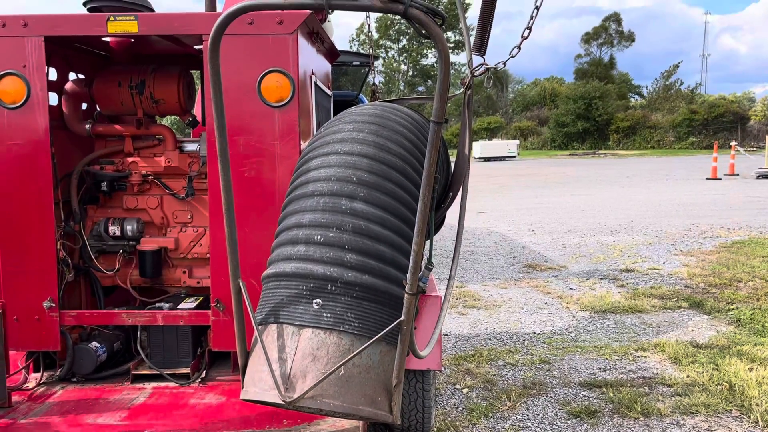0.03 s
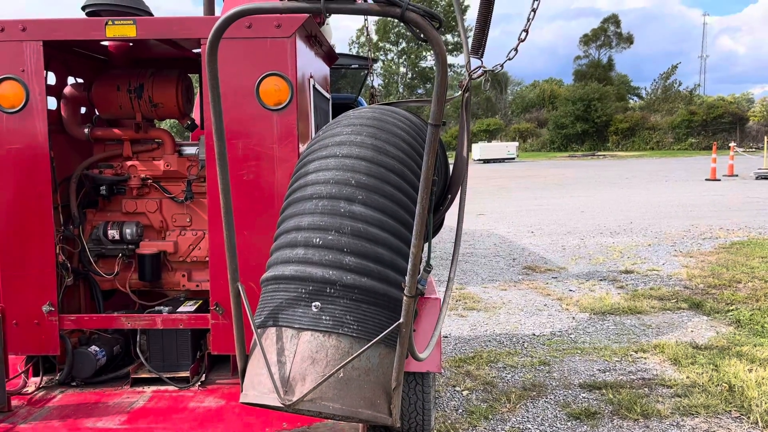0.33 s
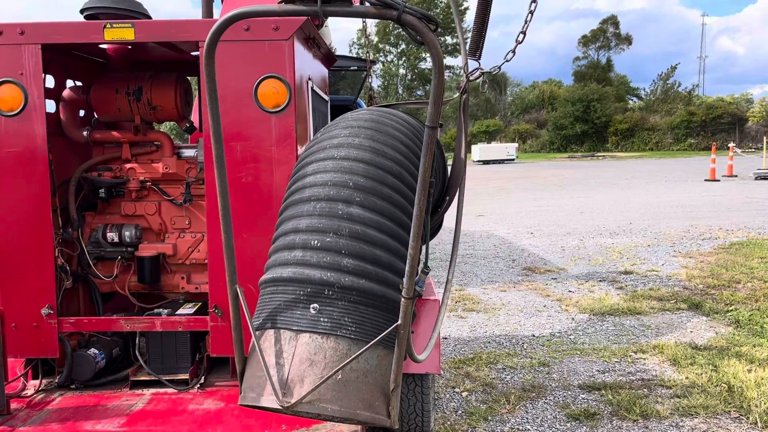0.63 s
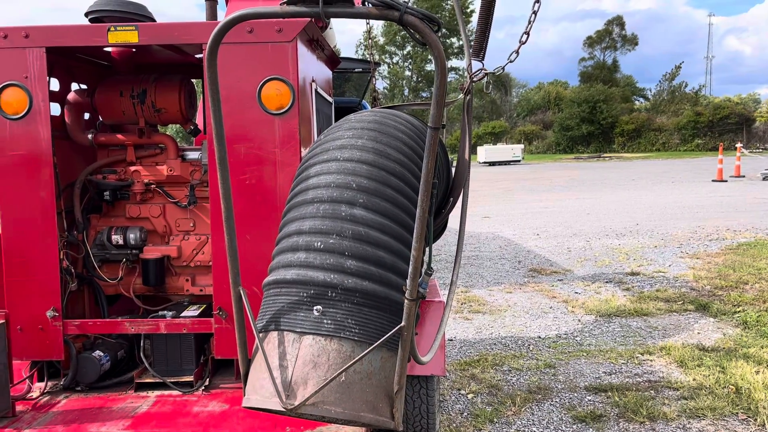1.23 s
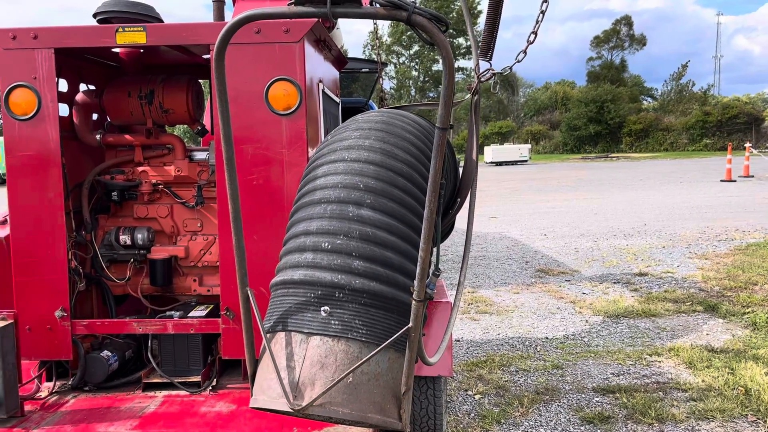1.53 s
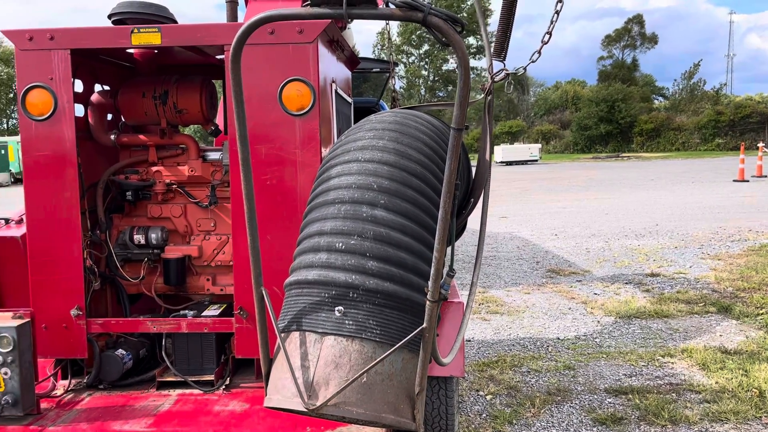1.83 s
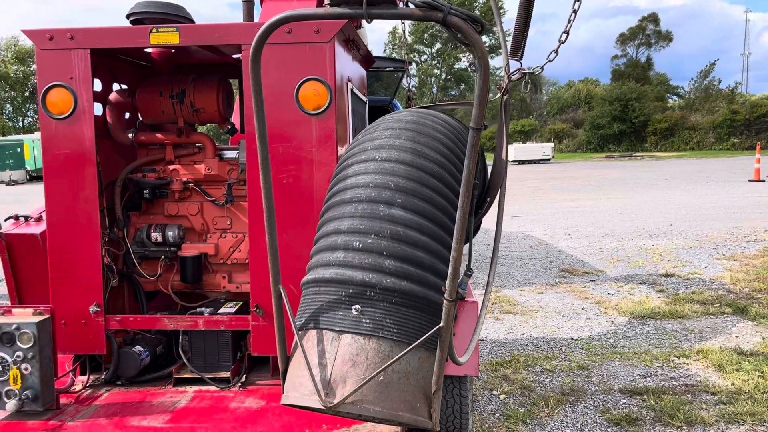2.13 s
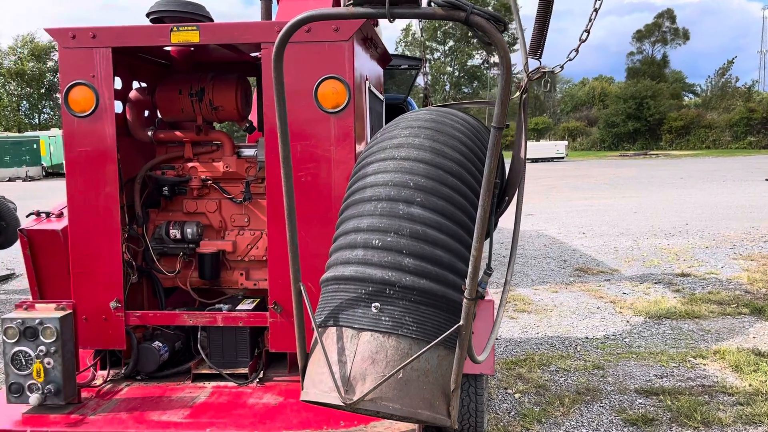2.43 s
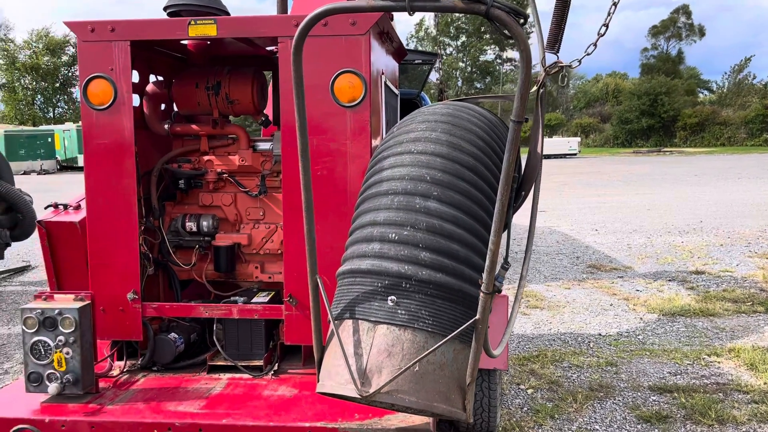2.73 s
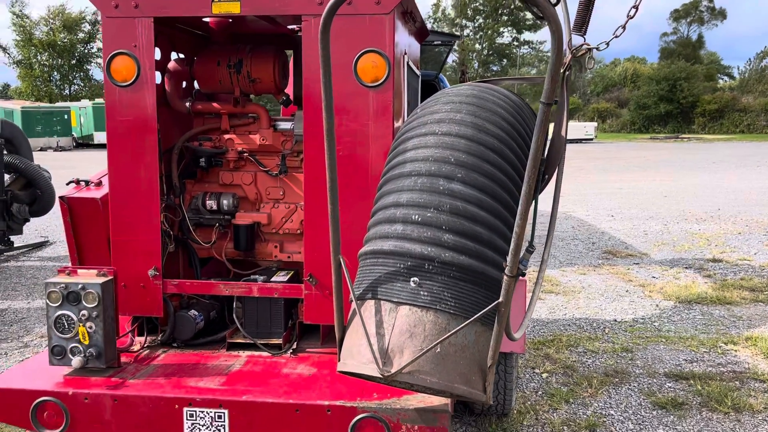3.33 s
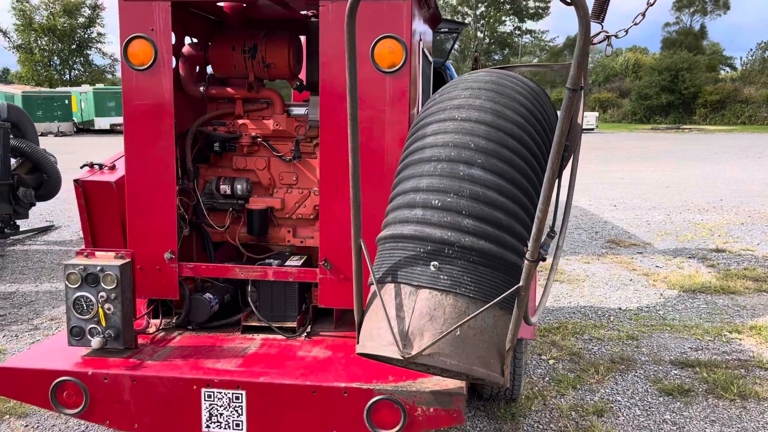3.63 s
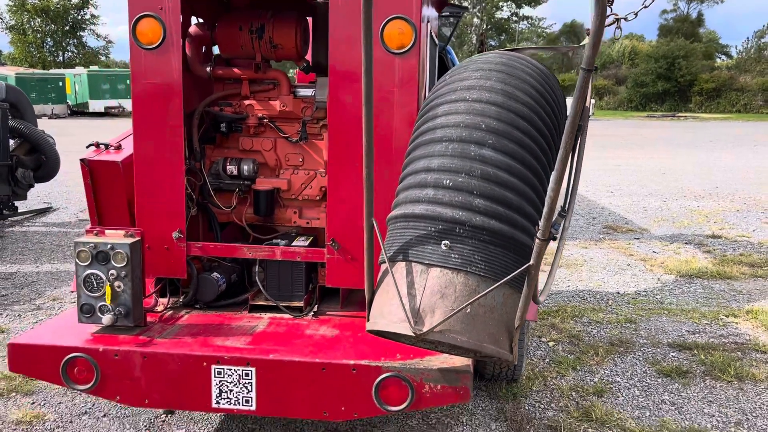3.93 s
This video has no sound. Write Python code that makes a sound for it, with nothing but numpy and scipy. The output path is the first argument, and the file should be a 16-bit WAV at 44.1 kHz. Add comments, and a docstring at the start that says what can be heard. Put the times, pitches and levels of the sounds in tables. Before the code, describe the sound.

A diesel engine on a leaf vacuum runs loudly outdoors, close and slightly left. For the first 0.8 seconds its exhaust barks roughly as the speed rises a touch. It then holds steady until 4 seconds, humming, clattering and hissing, with occasional sharp ticks and rushing fan air. Wind thumps the microphone around 1 second and repeatedly from 2.5 seconds, hardest at about 3.6.

```python
"""The four-cylinder diesel of a leaf vacuum, outdoors, close to a stereo microphone and a little left.
Its side panel is open. The exhaust barks a little as it pulls up the last bit of speed, then it holds
steady: crank orders hum, valves and injectors clatter and tick, combustion hisses and the impeller
rushes. A light breeze crosses the microphone, and gusts buffet it, hardest towards the end."""
import sys
import numpy as np
from scipy import signal
from scipy.fft import rfft, irfft, next_fast_len
from scipy.io import wavfile
from scipy.ndimage import uniform_filter1d, map_coordinates

SR = 44100
rng = np.random.default_rng(int(sys.argv[2]) if len(sys.argv) > 2 else 0)


def file_out(sig):
    """Save sig as 16-bit WAV at sys.argv[1]."""
    # one column per channel
    cols = np.atleast_2d(sig).T
    # limit, then scale
    lim = np.clip(cols, -1, 1)
    pcm = np.round(lim * 32767).astype(np.int16)
    wavfile.write(sys.argv[1], SR, pcm)


N = 176400
CYLINDERS = 4
STRIKE_JITTER_S = 0.00006  # timing scatter of valves and injectors


def amp(db):
    """Decibels to gain."""
    return np.exp(np.asarray(db) * (np.log(10) / 20))


def unit(x):
    """Scale to rms 1."""
    return x / np.sqrt(np.mean(x ** 2) + 1e-20)


def along(points, hz):
    """(f/Hz, value) points read on a log axis."""
    freqs, values = np.transpose(points)
    return np.interp(np.log(hz + 1), np.log(freqs + 1), values)


def curve(points):
    """(t/s, value) points read at every sample."""
    return np.interp(np.arange(N) / SR, *np.transpose(points))


def bump(at_s, half_s):
    """A bell-shaped swell of height 1."""
    return np.exp(-((np.arange(N) / SR - at_s) / half_s) ** 2)


def wobble(rate):
    """A smooth random curve, rate knots a second."""
    at = np.linspace(0, N, 4000)
    knots = rng.standard_normal(2000)
    return np.interp(np.arange(N), at, map_coordinates(knots, [at * rate / SR], order=3, mode="mirror"))


def tone(cycles, drift_rad=0):
    """A sine of rms 1 that follows a cycle count from a random phase."""
    return np.sqrt(2) * np.sin(2 * np.pi * (cycles + rng.random()) + drift_rad)


def noise():
    """Two unrelated white noises."""
    return rng.standard_normal((2, N))


def filtered(x, response):
    """Filter x by a gain that depends on frequency."""
    size = next_fast_len(N + SR // 2)
    return irfft(rfft(x, size) * response(np.fft.rfftfreq(size, 1 / SR)), size)[..., :N]


def strikes(count, jitter_s, scatter_db):
    """One pulse each time a rising count passes a whole number, uneven in time and size."""
    whole = np.arange(np.ceil(count[0]), count[-1])
    chance = rng.standard_normal((512, 2))[:len(whole)]
    at = np.interp(whole, count, np.arange(N)) + jitter_s * SR * chance[:, 0]
    taps = np.floor(at)[:, None] + np.arange(-7, 9)
    offset = taps - at[:, None]
    shape = np.sinc(offset) * np.sinc(offset / 8)  # lets a pulse fall between samples
    pulses = shape * amp(scatter_db * chance[:, 1:])
    return np.bincount(np.clip(taps, 0, N - 1).astype(int).ravel(), pulses.ravel(), N)


def ring(pulses, t60_s):
    """Pulses ring a dense set of short modes, heard along two paths."""
    t = np.arange(SR // 10) / SR
    response = unit(rng.standard_normal((2, len(t))) * amp(-60 * t / t60_s))
    return signal.fftconvolve(pulses[None], response, axes=1)[:, :N]


# Likeness of the microphone's left and right: f/Hz, correlation
MIC_CORRELATION = [(100, 0.86), (700, 0.99), (1300, 0.6), (2000, 0.98), (3600, 0.54), (7000, 0.51),
                   (8200, 1)]
def spread(pair, spectrum):
    """Colour two unrelated signals and blend them to left and right, rms 1."""
    def mid_side_gains(hz):
        angle = np.arccos(np.clip(along(MIC_CORRELATION, hz), -1, 1)) / 2
        return amp(along(spectrum, hz)) * np.array([np.cos(angle), np.sin(angle)])
    mid, side = filtered(pair, mid_side_gains)
    return unit(np.array([mid + side, mid - side]))


def turbulence(spectrum):
    """Churning air of even strength, so that the gust alone shapes its level."""
    air = spread(noise(), spectrum)
    power = uniform_filter1d(np.mean(air ** 2, axis=0), size=1100)
    return air / np.sqrt(np.abs(power))


# Gusts on the microphone: t/s, half length/s, level/dB
WIND_GUSTS = [(.85, 0.053, -25), (1.134, 0.034, -26.5), (2.58, 0.15, -29), (2.83, .04, -28),
              (3.048, 0.068, -23.5), (3.237, 0.062, -22.5), (3.591, 0.06, -18), (3.935, 0.026, -20.5)]
# Their low thump: f/Hz, relative level/dB
BUFFET_SPECTRUM = [(22, -32), (38, -2), (54, 2), (78, 4), (115, -7.5), (300, -20.5), (900, -72)]
# Eddies of the hardest gusts: f/Hz, relative level/dB
EDDY_SPECTRUM = [(60, -14), (100, -3), (200, 0), (320, -0.5), (480, -11), (1500, -65)]
def wind(breeze_db=-37.5, eddies_db=-20):
    """Gusts thump right on the microphone over a light breeze; the hardest reach higher in frequency."""
    gust = amp(breeze_db) + sum(amp(db) * bump(at_s, half_s) for at_s, half_s, db in WIND_GUSTS)
    eddies = amp(eddies_db) * (gust / gust.max()) ** 2.64
    return gust * turbulence(BUFFET_SPECTRUM) + eddies * turbulence(EDDY_SPECTRUM)


# Resonances of the steel enclosure: f/Hz, half width/Hz, level/dB
PANEL_MODES = [(1440, 140, 3), (5180, 74, 3), (5880, 51, 4.5), (6340, 99, 4)]
# Left over right at the microphone: f/Hz, level/dB
LEFT_LEVEL = [(60, 1), (600, 2.5), (1300, 4.5), (1600, 0), (2800, 0), (3600, 5), (5500, 0)]
# Lead of the left microphone port: f/Hz, phase/rad
LEFT_PHASE = [(100, 0), (1200, 0.72), (1520, 2.5), (1750, -0.13), (2200, 0.28), (3200, 1.75), (4500, 0.5),
              (5400, -1.7), (6500, 0), (7800, -3), (14000, -7.5)]
def enclosure_to_mic(hz):
    """The enclosure's colour, and the level and phase with which it reaches each microphone port."""
    share = np.array([[0.5], [-0.5]])  # left, right
    panels_db = sum(db / (1 + ((hz - centre) / width) ** 2) for centre, width, db in PANEL_MODES)
    return amp(panels_db + share * along(LEFT_LEVEL, hz)) * np.exp(1j * share * along(LEFT_PHASE, hz))


# Airflow behind the engine's sound: f/Hz, relative level/dB
RUSH_SPECTRUM = [(25, -22), (50, -11.5), (90, 2.5), (170, -6.5), (300, -4.5), (700, -3.5), (1000, -5.5),
                 (1500, -8.5), (2500, -10), (14000, -39.5)]
def impeller(level_db=-26):
    """Air rushes steadily through the fan and the hose."""
    return amp(level_db) * spread(noise(), RUSH_SPECTRUM)


# Colour of the hiss: f/Hz, relative level/dB
HISS_SPECTRUM = [(1500, -10), (3000, -2), (4300, 0.5), (6200, 0.5), (7000, -4), (10000, -10), (14000, -16)]
# Its slow easing: t/s, relative level/dB
HISS_TREND = [(0, -24), (.8, -25), (2.2, -27), (3.1, -28.5)]
def combustion_hiss(firings, level_db=-32.5, pulse_db=0.75, flicker_db=1.26):
    """Bright combustion noise that flares with every firing, each flare of its own strength."""
    trend_db = curve(HISS_TREND)
    strength = rng.uniform(0.6, 1.4, 512)[firings.astype(int)]
    flare = np.exp(-(firings % 1) / 0.55) * strength
    flare_db = pulse_db * unit(flare - flare.mean()) + flicker_db * wobble(120)
    return amp(level_db + trend_db - trend_db.mean()) * spread(noise() * amp(flare_db), HISS_SPECTRUM)


# The sharpest metallic ticks: t/s, relative level/dB
SHARP_TICKS = [(.157, 11.5), (.804, 8), (1.377, 9), (1.664, 8), (3.665, 3), (3.949, 5)]
# Colour of all ticks: f/Hz, relative level/dB
TICK_SPECTRUM = [(2500, -22), (6000, 0), (10500, 0.5), (14000, -6)]
def injection_ticks(firings, level_db=-47.5, soft_db=-6):
    """The injection ticks lightly with every firing; now and then one tick is much sharper."""
    cylinder_db = 4 * np.cos(2 * np.pi * firings / CYLINDERS)  # one cylinder ticks hardest
    pulses = amp(soft_db + cylinder_db) * strikes(firings, STRIKE_JITTER_S, scatter_db=4)
    for at_s, db in SHARP_TICKS:
        pulses[round(at_s * SR)] += amp(db)
    return amp(level_db) * spread(ring(pulses, t60_s=0.037), TICK_SPECTRUM)


# The ringing engine block, from close by: f/Hz, relative level/dB
BLOCK_SPECTRUM = [(400, -29), (620, -1.5), (900, 1), (1350, -1), (1900, -8.5), (2500, -7.5), (3500, -11.5),
                  (6300, -20), (9000, -24.5), (14000, -22.5)]
def clatter(firings, parts=14, level_db=-29):
    """Valves and injectors each strike once a cycle at their own crank angle, with their own ring."""
    ringing = np.zeros((2, N))
    for part in range(parts):
        cycles = firings / CYLINDERS + (part + rng.random()) / parts
        ringing += ring(strikes(cycles, STRIKE_JITTER_S, scatter_db=0.8), t60_s=0.038)
    return amp(level_db) * spread(ringing, BLOCK_SPECTRUM)


# Exhaust tones as the speed climbs: t/s, half length/s, firing harmonic, level/dB
EXHAUST_SWELLS = [(.04, 0.16, 2, -24), (0.28, 0.075, 4, -25), (.38, 0.18, 2, -28), (0.442, 0.069, 6, -26.5),
                  (0.376, 0.058, 12, -30), (0.505, 0.12, 8, -32), (0.584, 0.035, 13, -28)]
def exhaust_swells(firings):
    """Harmonics of the firing rate swell and fade one after another."""
    return sum(amp(db) * bump(at_s, half_s) * tone(harmonic * firings)
               for at_s, half_s, harmonic, db in EXHAUST_SWELLS)


# Course of the exhaust drone: t/s, level/dB
DRONE_LEVEL = [(.55, -34), (.69, -46), (.82, -33), (1.6, -33.5), (2.3, -33), (2.7, -29.5), (3.2, -34),
               (3.85, -32)]
def exhaust_drone(firings, harmonic=6):
    """One exhaust harmonic stands out, and swells for a while after the speed has settled."""
    return amp(curve(DRONE_LEVEL)) * tone(harmonic * firings)


# Exhaust puffs, from close by: f/Hz, relative level/dB
BARK_SPECTRUM = [(70, -25), (110, 3), (165, -10), (320, 1), (520, 1), (760, 4.5), (1000, -9), (3000, -36)]
def exhaust_bark(firings, load, full_load_db=-25, roughness=0.96):
    """Under load each firing leaves the exhaust as a sharp, rough puff."""
    pulses = strikes(firings, jitter_s=0.000089, scatter_db=2.0)
    gas = unit(noise() * amp(2.6 * np.cos(2 * np.pi * firings)))
    puffs = unit(ring(pulses, t60_s=0.013))
    return amp(full_load_db) * load * spread(puffs + roughness * gas, BARK_SPECTRUM)


# Moments when wind on the microphone briefly cancels the low throb: t/s
WIND_CANCELS = [0.895, 1.18, 2.71, 3.32, 3.511]
def firing_throb(firings, load, base_db=-27, load_db=2.5, waver_db=0.8, cancel_db=-17):
    """The low, wavering firing tone, stronger under load; set level cuts stand for wind cancelling it."""
    cancels = sum(bump(at_s, half_s=0.022) for at_s in WIND_CANCELS)
    return amp(base_db + load_db * load + waver_db * wobble(20) + cancel_db * cancels) * tone(firings)


# The engine's hum: multiple of the crank rate, relative level/dB
HUM_ORDERS = [(2.5, -10), (3, -16), (3.5, -12.5), (4, -7), (4.5, -11.5), (5.5, -12), (6, -3.5), (7, -4.5),
              (7.5, -12), (8, -9), (8.5, -16), (9, -13.5), (9.5, -12), (10, -15.5), (11, -8), (12.5, -19.5),
              (13, -11), (14, -19.5), (14.5, -14.5), (15, -8.5), (16.5, -13.5), (17, -6.5), (18, -17.5),
              (18.5, -21), (19, -16), (19.5, -14.5), (20, -9.5)]
# Whine of the fan and gear train: multiple of the crank rate, relative level/dB
WHINE_ORDERS = [(20.5, -12.5), (23, -14), (24, -14), (25, -15.5), (26, -12.5), (27.5, -13.5), (31.5, -13.5),
                (38.5, -16), (40, -19), (43.5, -16), (48.5, -13)]
def crank_hum(turns, load, base_db=-28, load_db=-3.5, waver_db=1.2):
    """Orders of the crankshaft, softer under load; half orders come from unequal cylinders."""
    hum = np.zeros(N)
    for order, db in list(HUM_ORDERS) + list(WHINE_ORDERS):
        partial = tone(order * turns, drift_rad=0.3 * wobble(10))
        hum += amp(db + load_db * load + waver_db * wobble(3.9)) * partial
    return amp(base_db) * hum


# Rotation of the crankshaft: t/s, f/Hz
CRANK_RATE = [(0, 26.6), (.15, 26.8), (.28, 27), (.45, 27.5), (.6, 27.6), (.8, 27.94), (4, 28.03)]
# Load, high while the engine gathers speed: t/s, load (0-1)
ENGINE_LOAD = [(0, 0.93), (.25, 0.92), (.6, 0.72), (.7, 0.5), (1.2, 0.2)]
def scene():
    """One crankshaft drives all engine layers; the machine stands close by, a little to the left."""
    crank_hz = curve(CRANK_RATE) * (1 + 0.000595 * wobble(7))
    turns = np.cumsum(crank_hz) / SR
    firings = turns * CYLINDERS / 2  # each cylinder fires every second turn
    load = curve(ENGINE_LOAD)
    machine = firing_throb(firings, load) + crank_hum(turns, load)
    machine = machine + exhaust_drone(firings) + exhaust_swells(firings) + exhaust_bark(firings, load)
    machine += clatter(firings) + injection_ticks(firings) + combustion_hiss(firings) + impeller()
    return filtered(machine, enclosure_to_mic) + wind()


def record(dry):
    """The recorder keeps nothing above its band limit."""
    return filtered(dry, lambda hz: hz < 14400)


dry = scene()
out = record(dry)
file_out(out)
```